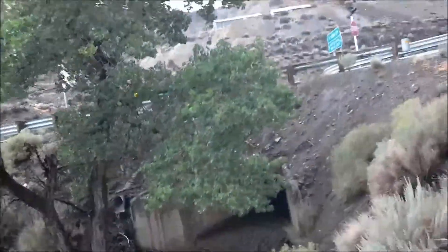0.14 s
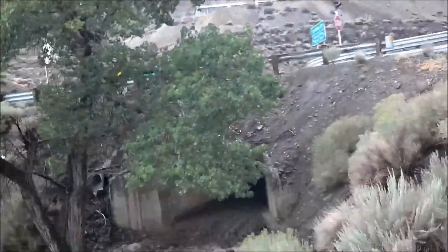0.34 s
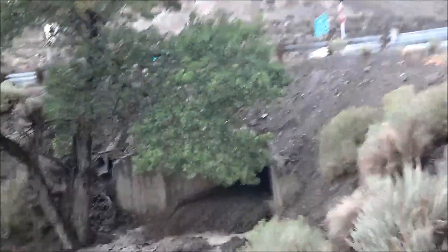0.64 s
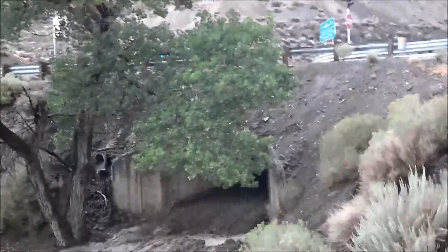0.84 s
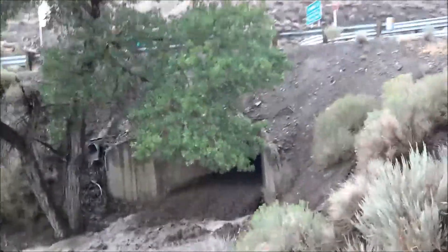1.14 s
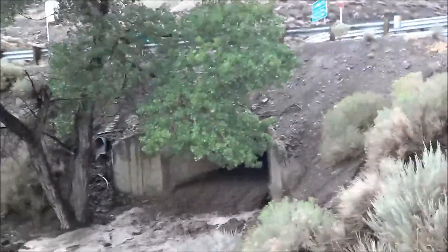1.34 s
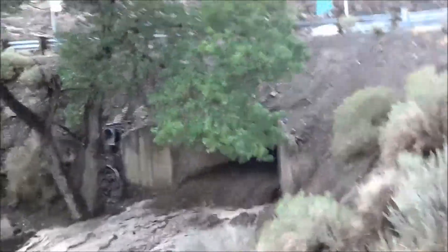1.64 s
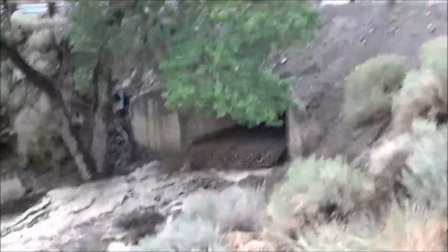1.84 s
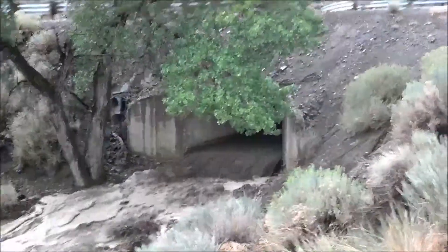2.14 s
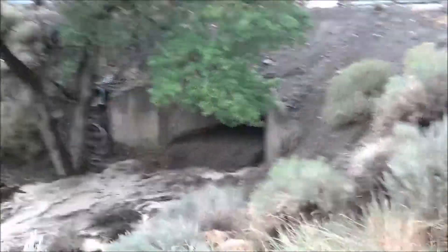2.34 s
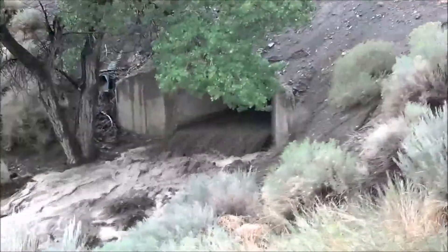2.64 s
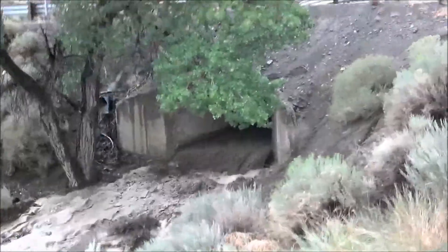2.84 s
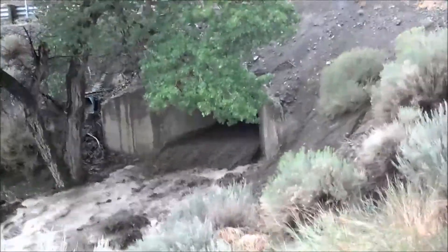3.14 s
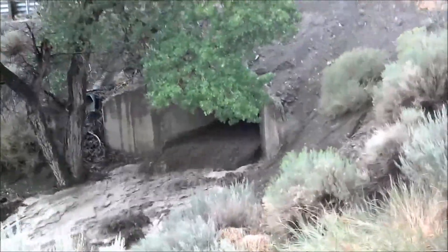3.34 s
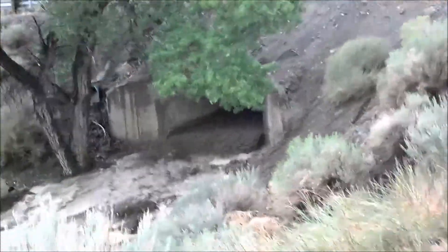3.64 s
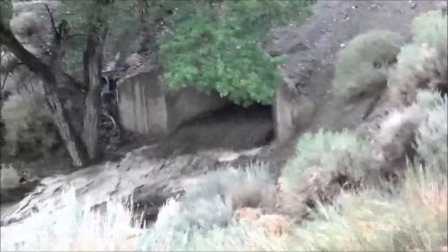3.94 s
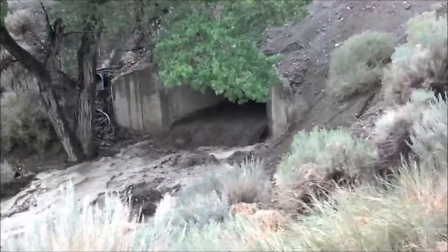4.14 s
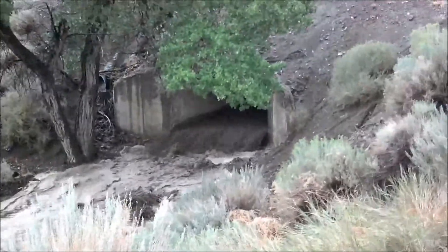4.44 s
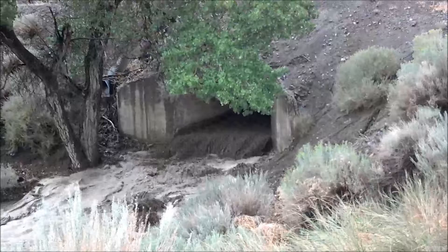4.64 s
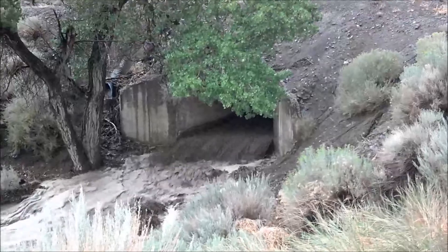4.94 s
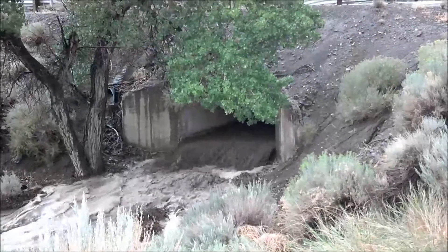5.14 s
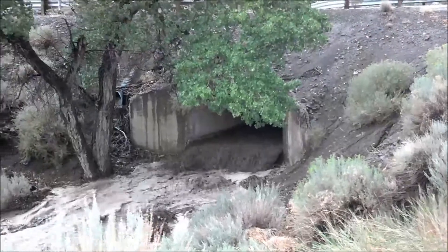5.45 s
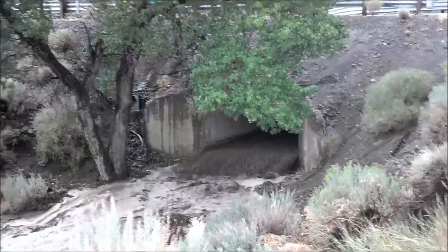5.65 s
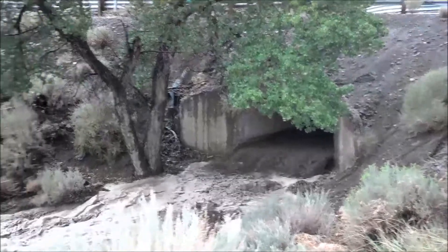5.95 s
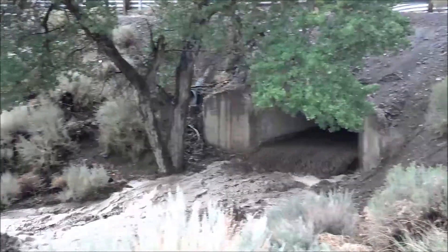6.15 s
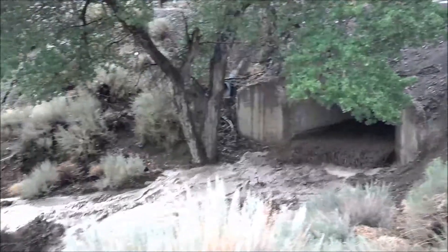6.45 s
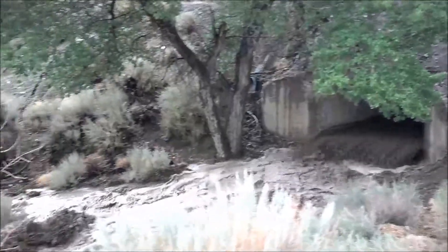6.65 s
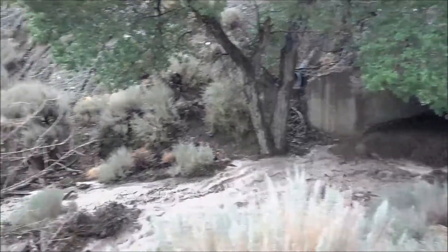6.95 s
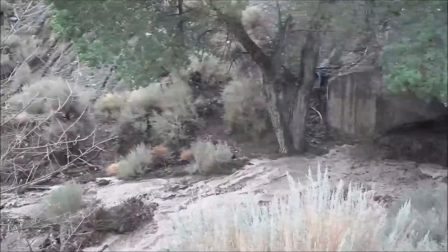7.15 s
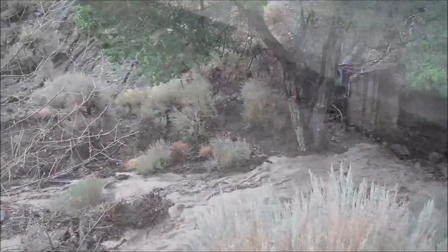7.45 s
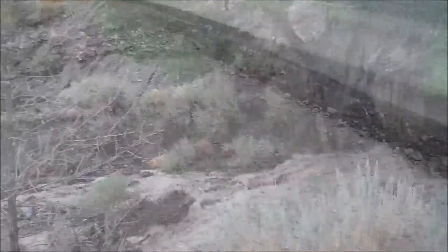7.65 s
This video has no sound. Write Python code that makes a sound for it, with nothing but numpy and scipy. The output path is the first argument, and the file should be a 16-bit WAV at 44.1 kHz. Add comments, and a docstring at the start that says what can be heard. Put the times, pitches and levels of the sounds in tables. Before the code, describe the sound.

A loud, churning torrent rushes from a hollow concrete tunnel, its volume dipping after small microphone clicks, with low wind rumble near the end.

```python
"""Muddy floodwater pours out of a concrete culvert and down a desert gully, heard from the bank above.
Filtered noise makes the foam and the roar, fading sine waves make the bubbles, and tiny ticks make the spray.
Short swells of noise make the sloshes and culvert booms, sharp pulses the slaps, and ringing noise the drone.
The hand-held camera turns, mostly to the left, while wind puffs and a breeze rumble on its two microphone ports.
Clicks of its casing make the gain control duck and creep back."""
import sys
import numpy as np
from scipy import signal
from scipy.fft import rfft, irfft
from scipy.io import wavfile
from scipy.ndimage import uniform_filter1d, map_coordinates

SR = 44100
rng = np.random.default_rng(int(sys.argv[2]) if len(sys.argv) > 2 else 0)


def wav_record(signal):
    """Record a signal, one row per channel, as 16-bit PCM in the file named by sys.argv[1]."""
    frames = np.transpose(np.atleast_2d(signal))
    bounded = np.clip(frames, -1, 1)
    # unit amplitude maps onto the largest positive 16-bit level
    quanta = np.round(bounded * 32767).astype(np.int16)
    wavfile.write(sys.argv[1], SR, quanta)


N = 343539
TIME = np.arange(N) / SR  # s
HZ = np.maximum(np.fft.rfftfreq(N, 1 / SR), 1)
# sound's travel time from port to port, and the delay used to make stereo of the two ports
PORT_SPACING_S, PORT_LAG_S = 20 / SR, 16 / SR
# directions to the left of the wildest water and of the culvert mouth
MAIN_BEARING_DEG, CULVERT_BEARING_DEG = 23.6, 40


def undb(db):
    """Turn decibels into a gain."""
    return 10 ** (np.asarray(db) / 20)


def unit(x):
    """Scale to an rms (average strength) of 1."""
    return x / np.sqrt(np.mean(x ** 2))


def curve(table, at=TIME):
    """Join the points of each table column by straight lines in time."""
    s, *columns = np.transpose(table)
    return [np.interp(at, s, column) for column in columns]


def shape(x, gain):
    """Filter a sound with one gain per frequency."""
    return irfft(rfft(x) * gain, N)


def colour(points):
    """Draw a smooth tone colour through points of frequency [Hz] and gain [dB]."""
    hz, db = np.transpose(points)
    return undb(np.interp(np.log(HZ), np.log(hz), db))


def resonance(hz, width, at=HZ):
    """Response of something that rings at one pitch, with gain 1 at its centre."""
    return 1 / (1 + 1j * (at ** 2 - hz ** 2) / (at * width))


def swell(s, length, at=TIME):
    """A smooth bump around time s, about as wide as length."""
    return np.exp(-np.minimum((2 * (at - s) / length) ** 2, 50))


def waver(per_second):
    """A random level that drifts in time, with a spread near 1."""
    return 1.2 * np.interp(per_second * TIME, np.arange(512), rng.standard_normal(512))


def patches(hz, s, per_octave, per_second):
    """Random levels that drift over frequency and time, with a spread near 1."""
    where = np.meshgrid(per_octave * np.log2(1 + hz / 100), per_second * s, indexing="ij")
    return 1.5 * map_coordinates(rng.standard_normal((64, 1024)), where, order=1, mode="wrap")


def bursts(table, width_share):
    """Short swells of noise, each around its own pitch; the width is a share of that pitch."""
    size = 16384
    out = np.zeros(N + size)
    at = np.fft.rfftfreq(size, 1 / SR) + 1
    for s, db, hz, length in table:
        response = resonance(hz, width_share * hz, at) ** 2
        cloud = unit(irfft(rfft(rng.standard_normal(size)) * response))
        start = int(s * SR) - size // 2
        cloud_time = (start + np.arange(size)) / SR
        out[start:start + size] += undb(db) * cloud * swell(s, length, cloud_time)
    return out[:N]


# where the camera points: (time [s], direction [degrees to the left])
CAMERA_TURN = [(0, 6.5), (2.3, 4.9), (5.3, 4.6), (6.0, 15), (6.55, 18.7), (7.1, 27.4), (7.79, 28.7)]


def arrive(x, bearing, churn_db=0):
    """Sound reaches one port before the other, depending on direction; churning moves its bands about."""
    frame, rapid_width_deg, heave_share, flicker_share = 512, 3.7, 0.55, 1.42
    hz, s, z = signal.stft(x, SR, nperseg=frame)
    if churn_db:
        heave = heave_share * patches(hz, s, 0.45, 14)  # broad and slow
        flicker = flicker_share * patches(hz, s, 1.25, 52)  # narrow and quick
        calmer_treble = 1 + hz[:, None] / 7000
        z = z * undb(churn_db * (heave + flicker) / calmer_treble)
        bearing = bearing + rapid_width_deg * patches(hz, s, 7, 30)
    lag_s = PORT_SPACING_S * np.sin(np.radians(bearing - curve(CAMERA_TURN, s)[0]))
    lead = np.exp(1j * np.pi * hz[:, None] * lag_s)  # half the lag at each port
    return signal.istft(np.array([z * lead, z / lead]), SR, nperseg=frame)[1][:, :N]


def pair(ports, lift_hz=540):
    """Make stereo: each channel is one port minus the delayed other, with the lost bass lifted back."""
    z = rfft(ports)
    delayed_other = z[::-1] * np.exp(-2j * np.pi * HZ * PORT_LAG_S)
    lift = (1j * HZ + lift_hz) / (1j * HZ + 30) / np.sqrt(2)
    return irfft((z - delayed_other) * lift, N)


# wind puffs: (time [s], level [dB])
WIND_PUFFS = [(2.52, -46), (3.868, -32), (4.03, -30), (4.205, -29), (4.45, -36), (4.60, -36), (4.8, -40),
              (5.63, -39), (6.336, -33), (6.465, -33)]
# breeze on the casing, before its overall gain and eddies: (time [s], level [dB])
BREEZE_STRENGTH = [(3.4, -74), (4.21, -63), (4.32, -68), (6.815, -74), (6.835, -50), (7.02, -47),
                   (7.1, -49), (7.27, -47), (7.37, -38), (7.51, -44), (7.57, -37), (7.62, -41), (7.69, -36),
                   (7.79, -39)]
# tone of the breeze's rumble: (frequency [Hz], relative level per Hz [dB])
RUMBLE_COLOUR = [(10, -3), (25, -3), (55, 5), (100, -0.5), (150, -14), (240, -18), (500, -56)]


def wind():
    """Puffs push the two channels opposite ways; a breeze full of eddies rumbles in each on its own."""
    puff_hz, puff_s, left_share = 122, 0.14, 0.73
    breeze_gain_db, eddy_db, eddies_per_s = 7, -1.5, 22
    puffs = bursts([(s, db, puff_hz, puff_s) for s, db in WIND_PUFFS], width_share=0.97)
    rumble = unit(shape(rng.standard_normal((2, N)), colour(RUMBLE_COLOUR)))
    breeze_db = curve(BREEZE_STRENGTH)[0] + breeze_gain_db + eddy_db * waver(eddies_per_s)
    return np.array([left_share * puffs, -puffs]) + rumble * undb(breeze_db)


# casing clicks: (time [s], tick strength before its filters [dB], peak of the very high ring [dB])
CASING_CLICKS = [(.2568, -10.5, -0.5), (1.2542, -5, 4.5), (1.7475, -7, -0.5), (4.309, -16, 0.5),
                 (5.48, -20, -5)]
# tone of a tick: (frequency [Hz], gain [dB])
CASING_COLOUR = [(500, -14), (3000, -4), (4500, 4), (7300, 4), (10500, -8), (12500, 2), (15000, 6.5)]


def casing(decay_s=.00055, ring_s=.0007):
    """The casing clicks in the hand: a dry tick of noise, and a very high ring that sets off the gain control."""
    ring_hz = 19500
    ticks = ring = 0
    for s, db, ring_db in CASING_CLICKS:
        fade = np.exp(-np.minimum(np.abs(TIME - s) / decay_s, 20))
        ticks = ticks + undb(db) * (TIME >= s) * fade
        ring = ring + undb(ring_db) * swell(s + ring_s, ring_s)
    at_ports = shape(ticks * rng.standard_normal((2, N)), colour(CASING_COLOUR)) / 2
    return pair(at_ports) + ring * np.sin(2 * np.pi * ring_hz * TIME)


# slow surges of the flood, added to other levels: (time [s], level [dB])
FLOOD_SURGES = [(0.0, 0.4), (0.6, 0.8), (0.85, 0.7), (1.2, -.6), (1.4, 0), (1.9, -0.6), (2.15, -0.9),
                (2.3, -0.1), (2.85, -1), (3.08, -1.3), (3.22, 0.9), (3.62, -1.1), (3.9, 1.1), (4.2, -0.3),
                (4.4, -0.5), (4.9, -0.6), (5.12, 0.8), (5.42, 1.5), (5.73, -3), (5.85, -0.5), (6.1, -1.5),
                (6.25, .5), (6.7, -1), (7.3, 0.1), (7.77, -1)]


def surges():
    """The flow swells and sinks, and its loudness with it (in dB)."""
    return curve(FLOOD_SURGES)[0]


# air resonances of the culvert: (pitch [Hz], width of one pass [Hz], level [dB])
CULVERT_MODES = [(324, 49, -15.5), (398.6, 99, -3), (440, 28, -1), (465, 49, -3.5), (648, 150, -5.5),
                 (998, 43, -13), (1350, 220, -30)]
# the culvert's drone, before the surges are added: (time [s], level [dB])
CULVERT_DRONE = [(0, -36), (0.85, -45), (1.1, -35.5), (1.4, -35), (2.3, -40), (3.9, -36.5), (4.5, -35),
                 (5.2, -36.5), (6.2, -33.5), (6.6, -36), (7.0, -37), (7.79, -40)]


def culvert():
    """The rush inside the concrete box makes its air ring at a few pitches."""
    # squaring passes the noise through each resonance twice
    modes = sum(undb(db) * resonance(hz, width) ** 2 for hz, width, db in CULVERT_MODES)
    drone = arrive(shape(rng.standard_normal(N), modes), CULVERT_BEARING_DEG, churn_db=1.5)
    return unit(pair(drone)) * undb(curve(CULVERT_DRONE)[0] + surges())


# the strongest sloshes and culvert booms: (time [s], level [dB], pitch [Hz], length [s])
SLOSHES_AND_BOOMS = [(1.868, -32, 905, 0.03), (1.969, -27.5, 510, 0.015), (2.28, -30, 426, 0.035),
                     (2.957, -29.5, 1070, 0.023), (3.29, -30, 594, 0.05), (3.334, -31, 1200, 0.014),
                     (6.535, -21.5, 434, 0.025), (6.618, -26, 503, 0.016), (6.793, -24.5, 444, 0.049),
                     (6.96, -28, 766, 0.033)]


def sloshes_and_booms():
    """A wave folds over or the culvert booms: a short swell of noise around one pitch."""
    return pair(arrive(bursts(SLOSHES_AND_BOOMS, width_share=0.37), MAIN_BEARING_DEG))


# sharp slaps of falling water, before the stereo step: (time [s], peak [dB], pitch [Hz])
WATER_SLAPS = [(1.848, -12.5, 600), (2.9555, -16, 1100), (2.9842, -12.5, 1200), (3.3272, -9, 1100),
               (3.3348, -13, 1300), (6.948, -12.5, 1200)]


def slaps():
    """Water smacks down flat: one sharp pulse that dies within a cycle or two."""
    fade_cycles = 0.6  # to about a third of the strength
    out = np.zeros(N)
    age = np.arange(1024) / SR
    for s, db, hz in WATER_SLAPS:
        start = int(s * SR)
        pulse = np.exp(-age * hz / fade_cycles) * np.cos(2 * np.pi * hz * age)
        out[start:start + len(age)] += undb(db) * pulse
    return pair(arrive(out, MAIN_BEARING_DEG))


def scatter():
    """The banks throw the noise back from all sides: alike at both ports in the bass only."""
    alike = np.sinc(2 * HZ * PORT_SPACING_S)
    common = shape(rng.standard_normal(N), np.sqrt((1 + alike) / 2))
    apart = shape(rng.standard_normal(N), np.sqrt((1 - alike) / 2))
    return np.array([common + apart, common - apart])


# early echoes: (delay [ms], level [dB], direction [degrees left of the camera's axis])
EARLY_ECHOES = [(2.25, -21, -10), (3.0, -18, -10), (3.6, -20, 75), (4.7, -20, -10)]


def reflect(ports):
    """Surfaces close by add faint, dull early echoes, which make the rush hollow."""
    echo_top_hz = 2250  # echoes fade above this pitch
    z = rfft(ports)
    heard = z
    thrown_back = z[0] / (1 + (HZ / echo_top_hz) ** 4)
    for ms, db, bearing in EARLY_ECHOES:
        lead_s = PORT_SPACING_S * np.sin(np.radians(bearing)) / 2 * np.array([[1], [-1]])
        delay = np.exp(-2j * np.pi * HZ * (ms / 1000 - lead_s))
        heard = heard + undb(db) * thrown_back * delay
    return irfft(heard, N)


def bubbles(count, low_hz, high_hz, cycles, spread_db, glide):
    """Trapped air pockets ring and fade by 60 dB in some cycles, rising in pitch as they near the surface."""
    when, pitch, size = rng.random((count, 3)).T[:, :, None]
    hz = low_hz * (high_hz / low_hz) ** pitch
    age = np.arange(1024)  # samples
    turns = hz * age / SR
    gain = undb(-spread_db * np.log(.01 + size)) * np.sqrt(hz)
    fade = np.exp(-np.log(1000) * turns / cycles)
    rings = gain * fade * np.sin(2 * np.pi * turns * (1 + glide * turns / cycles))
    places = (when * N).astype(int) + age
    return unit(np.bincount(places.ravel(), rings.ravel(), N)[:N])


def droplets(count, spread_db):
    """Spray falls back as tiny ticks of very unequal size."""
    when, size, sign = rng.random((count, 3)).T
    gain = undb(-spread_db * np.log(.002 + size))
    return unit(np.bincount((when * N).astype(int), gain * np.sign(sign - .5), N))


# rapids along the gully: (direction [degrees to the left], relative level [dB])
GULLY_RAPIDS = [(-6, -8), (14, -3.5), (22.5, -1), (33.5, 0), (40, -8.5)]
# tone of the rushing water: (frequency [Hz], gain [dB])
RUSH_COLOUR = [(40, -52), (80, -16), (120, 1), (175, 2), (280, -4.5), (430, -2), (800, -6.5), (1200, -7.5),
               (1800, -6.5), (2250, -7.5), (2750, -12.5), (4200, -13.5), (5500, -15), (7000, -16),
               (9800, -25), (12500, -27), (15000, -20.5)]


def torrent():
    """Foam churns and bubbles ring at each rapid, with spray on top; the whole flood surges."""
    water_db, scatter_db, gurgle_db, droplets_db = -25.5, -1.1, -20.5, -7.5
    spray_follow, spray_db = 1.0, -0.05  # treble's share of the surges (dB per dB), and its extra level
    scatter_low_hz, scatter_top_hz = 204, 4530  # the banks throw back little beyond these
    banks = 1 / np.hypot(1, (scatter_low_hz / HZ) ** 2) / np.hypot(1, HZ / scatter_top_hz)
    ports = undb(scatter_db) * shape(scatter(), banks)
    for bearing, db in GULLY_RAPIDS:
        gurgle = bubbles(count=500, low_hz=329.3, high_hz=2130, cycles=26.6, spread_db=1.5, glide=0.097)
        foam = rng.standard_normal(N) + undb(gurgle_db) * gurgle
        ports = ports + undb(db) * unit(arrive(foam, bearing, churn_db=2.0))
    spray_ticks = droplets(count=9000, spread_db=3.5)
    ports = ports + undb(droplets_db) * arrive(spray_ticks, MAIN_BEARING_DEG)
    water = unit(shape(pair(reflect(ports)), colour(RUSH_COLOUR)))
    roar = shape(water, 1 / (1 + (HZ / 2600) ** 4))  # the lower part
    spray = water - roar
    surge_db = surges()
    return undb(water_db) * (roar * undb(surge_db) + spray * undb(spray_db + spray_follow * surge_db))


def scene():
    """Add up the water, the culvert, the wind and the clicks."""
    return torrent() + culvert() + sloshes_and_booms() + slaps() + wind() + casing()


def record(dry, limit_db=-6, start_db=8.5, recover_db_per_s=9.5, attack_s=0.0017):
    """Gain control ducks quickly on a peak and recovers steadily, starting out ducked; then the top is cut."""
    top_hz = 15620
    power = 2 * uniform_filter1d(np.mean(dry ** 2, axis=0), size=12)
    over_db = np.maximum(10 * np.log10(np.abs(power) + 1e-12) - limit_db, 0)
    recovered_db = recover_db_per_s * TIME
    # the deepest duck so far, less what has been recovered since
    held_db = np.maximum.accumulate(over_db + recovered_db)
    duck_db = np.maximum(held_db, start_db) - recovered_db
    span = max(int(attack_s * SR), 1)
    duck_db = uniform_filter1d(uniform_filter1d(duck_db, span), span)  # soften the onset
    return shape(dry * undb(-duck_db), 1 / (1 + (HZ / top_hz) ** 160))


dry = scene()
out = record(dry)
wav_record(out)
```